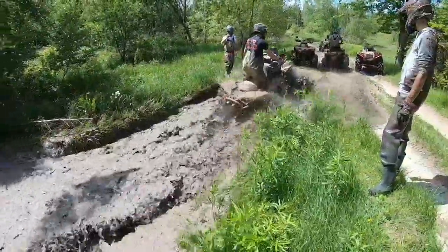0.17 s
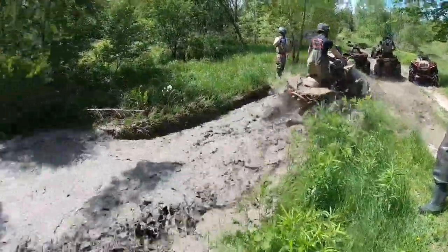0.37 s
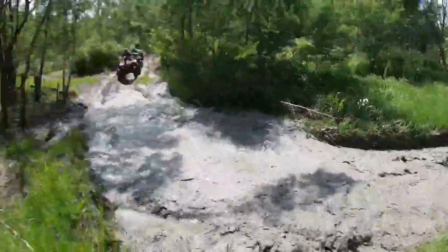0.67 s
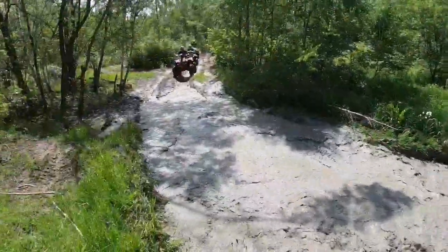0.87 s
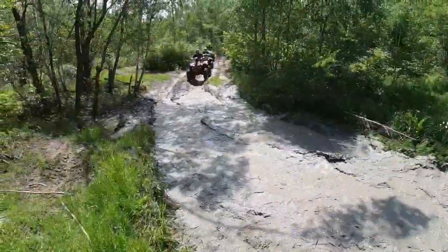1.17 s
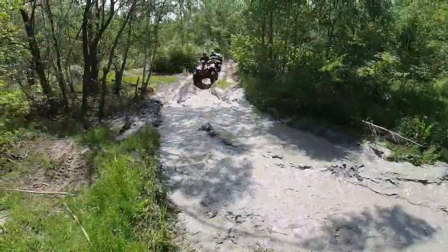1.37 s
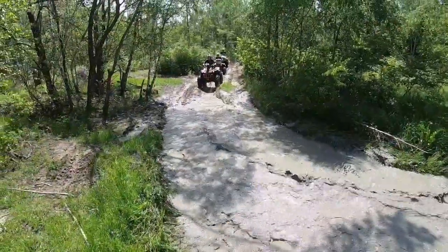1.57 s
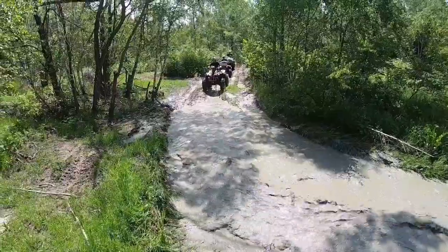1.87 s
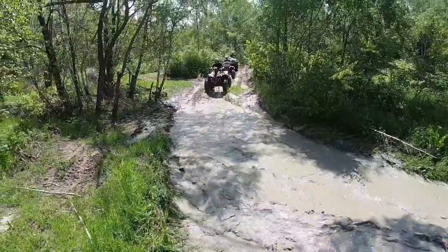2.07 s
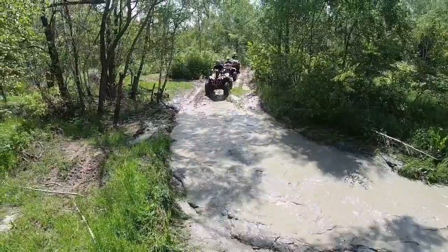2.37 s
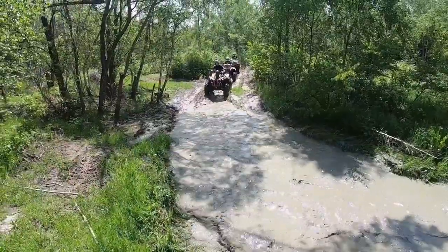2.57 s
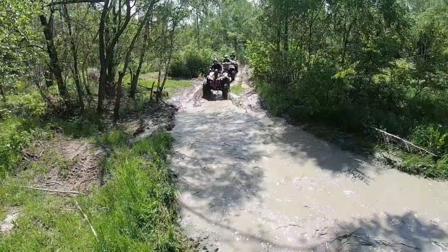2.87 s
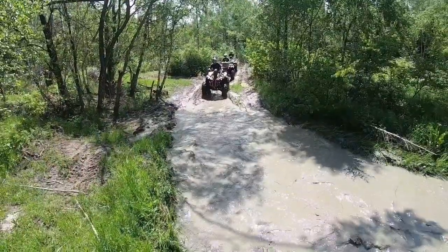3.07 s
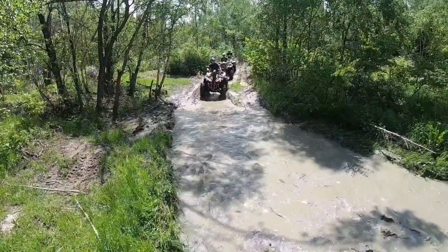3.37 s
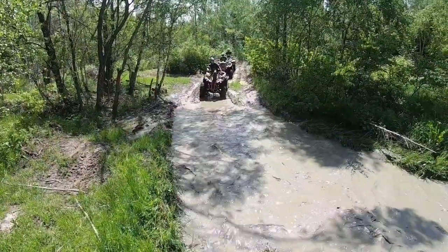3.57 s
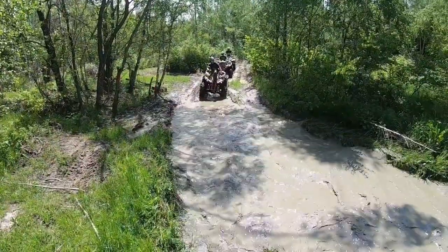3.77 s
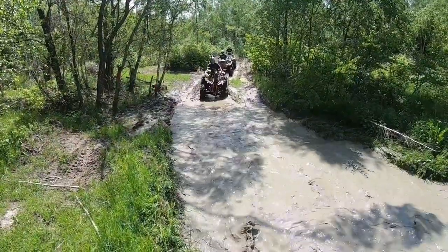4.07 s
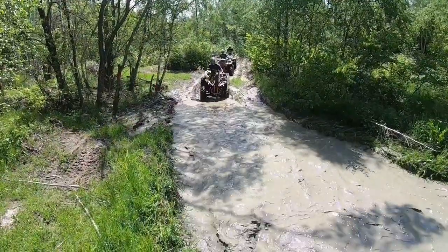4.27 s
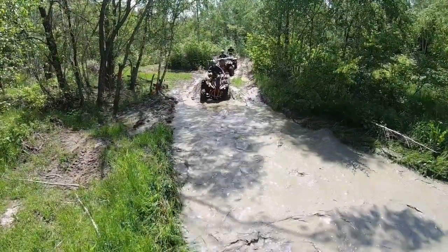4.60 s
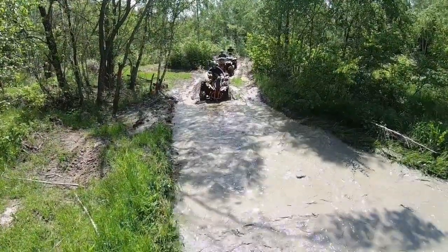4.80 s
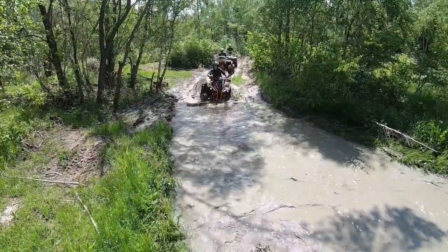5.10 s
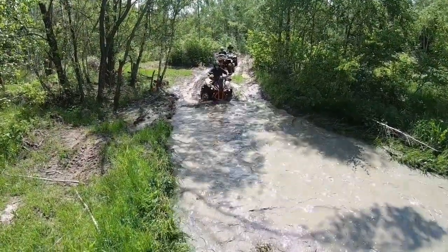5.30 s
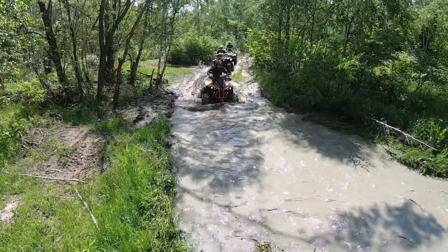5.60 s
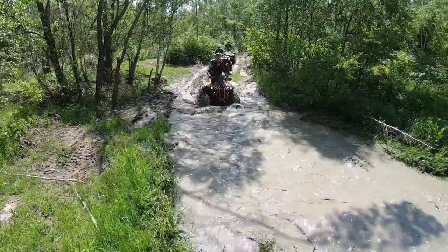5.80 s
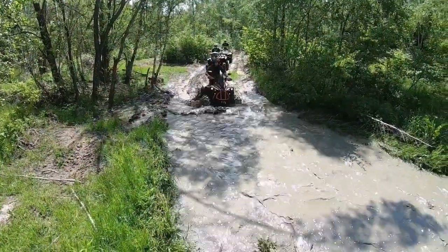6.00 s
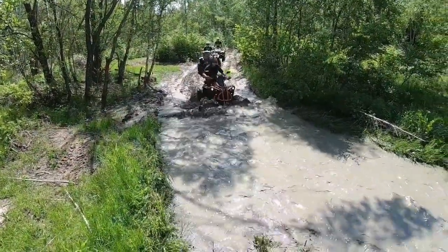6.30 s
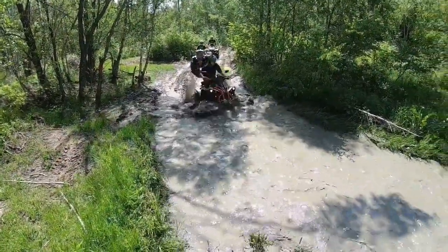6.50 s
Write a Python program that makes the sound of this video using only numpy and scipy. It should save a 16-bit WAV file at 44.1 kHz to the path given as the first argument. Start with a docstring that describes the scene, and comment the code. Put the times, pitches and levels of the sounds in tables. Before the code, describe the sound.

Close, raspy twin-cylinder engine climbs in pitch and passes within the first half second, flinging wet mud. Lumpy, overlapping idles follow with light water wash and a faint grasshopper scrape. Then an approaching quad gives short throttle blips and longer surges, splashing harder and ending at its loudest, highest revs. Open woodland, with engine sound scattered by trees, heard from beside the mud hole.

```python
"""An engine booms and rasps close by as a V-twin quad bike revs out of water on a muddy forest track and
drives off; two more crawl up, the first blipping its throttle several times and opening up as it nears.
Uneven firing pulses pass through silencer responses for boom and bark; gas noise, ringing and shocks make
the rasp. Shaped noise and random impacts make water and mud, short noise bursts a grasshopper."""
import sys
import numpy as np
from scipy import signal
from scipy.fft import rfft, irfft, next_fast_len
from scipy.io import wavfile
from scipy.ndimage import uniform_filter1d, minimum_filter1d, map_coordinates

SR = 44100
rng = np.random.default_rng(int(sys.argv[2]) if len(sys.argv) > 2 else 0)


def dump_mix(stems):
    """Bounce the given channels to the path in sys.argv[1] as a 16-bit WAV at rate SR."""
    frames = np.atleast_2d(stems).T  # one column per channel
    limited = np.clip(frames, -1, 1)  # hard clip at full scale
    pcm = np.round(limited * 32767).astype(np.int16)
    wavfile.write(sys.argv[1], SR, pcm)


N = 293265
TIME = np.arange(N) / SR
PASS_S = 0.362   # the leaving quad's tailpipe swings past the listener


def from_db(db):
    """Decibels to gain."""
    return 10 ** (np.asarray(db) / 20)


def in_time(rows):
    """Each column of a curve at every sample."""
    s, *columns = np.transpose(rows)
    return [np.interp(TIME, s, c) for c in columns]


def even(x, size=5000):
    """Hold the slow level near rms 1, leaving the single beats alone; size is in samples."""
    power = uniform_filter1d(uniform_filter1d(x * x, size), size)
    return x / np.sqrt(np.abs(power) + 1e-14)


def gains(points, size):
    """A spectrum table as gains on an FFT grid."""
    hz, db = np.transpose(points)
    grid_hz = np.arange(size // 2 + 1) * SR / size
    return from_db(np.interp(np.log(grid_hz + 1), np.log(hz), db))


def colour(x, points):
    """Causal (minimum-phase) filter with the given response."""
    size = next_fast_len(N + SR // 2, True) // 2 * 2
    cepstrum = irfft(np.log(gains(points, size)))
    # folding the cepstrum onto positive time gives minimum phase
    cepstrum[1:size // 2] *= 2
    cepstrum[size // 2:] = 0
    return irfft(rfft(x, size) * np.exp(rfft(cepstrum)))[..., :N]


def crossover(x, hz, kind):
    """Steep low or high half of a signal; the two halves add in phase."""
    sos = signal.butter(4, hz, kind, fs=SR, output="sos")
    return signal.sosfiltfilt(sos, x)


def bandpass(x, order, low_hz, high_hz):
    """Causal resonant band."""
    sos = signal.butter(order, [low_hz, high_hz], "band", fs=SR, output="sos")
    return signal.sosfilt(sos, x)


def drift(rate):
    """Random wander around 0: normal draws, rate of them a second, joined by straight lines."""
    knots = rng.standard_normal(2048)
    return map_coordinates(knots, [TIME * rate], order=1, mode="wrap")


def drops(per_s, spread):
    """Random impacts at a wandering rate, many small and a few large; spread is in dB."""
    sizes = from_db(spread * np.minimum(rng.exponential(1, N), 6)) * rng.choice([-1, 1], N)
    hits = rng.random(N) < per_s * from_db(3 * drift(25)) / SR
    return even(sizes * hits)


def grasshopper(tick_db=-4, tick_s=0.0083):
    """Short, high scrapes, about ten a second within each run: noise that strikes at once and fades after each."""
    # Each row: time in seconds, level in dB before the tick_db trim.
    ticks = [(3.705, -43), (3.8046, -41), (3.8998, -45), (4.089, -48), (4.187, -48), (4.283, -49),
             (4.374, -46), (4.4682, -45), (4.661, -45)]
    bursts = sum(from_db(db + tick_db) * (TIME > s) * np.exp(-np.abs(TIME - s) / tick_s) for s, db in ticks)
    scrape = colour(rng.standard_normal(N), [(5000, -33), (7800, 6), (9000, 6.5), (11000, -25)])
    return bursts * even(scrape)


def water(slosh_db=11.5, spray_db=0.0, grain=0.62, patchy_db=1.0):
    """Wheels churn the pool: a gurgling wash, and spray that patters back."""
    # Level of the spray. Each row: time in seconds, level in dB before the trims.
    spray_level = [(0.0, -41), (0.3, -41.5), (0.33, -40.5), (0.94, -47), (1.2, -45), (1.76, -49.5),
                   (1.85, -45.5), (2.15, -49.5), (3.09, -44), (3.39, -49.5), (5.24, -51), (5.81, -49.5),
                   (5.96, -51), (6.48, -40.5), (6.59, -40.5), (6.65, -37)]
    # Tone of the gurgling wash. Each row: frequency in Hz, relative dB per Hz.
    slosh_colour = [(200, -0.5), (350, 10.5), (600, 1), (850, -5), (1250, -4.5), (1650, -4), (2000, -6.5),
                    (2350, -6.5), (2650, -11), (3100, -7.5), (3700, -15.5), (5000, -22), (8000, -49)]
    # Tone of the pattering spray. Each row: frequency in Hz, relative dB per Hz.
    spray_colour = [(2500, -0.5), (4000, 4), (5500, 5), (6500, 4.5), (7300, 5.5), (8400, 4), (9200, -3),
                    (10200, -3), (11200, -17.5), (14000, -16), (15000, -35)]
    slosh_follows = 0.94   # share of the spray's swing in dB that the slosh follows
    spray, = in_time(spray_level)
    slosh = spray.mean() + slosh_follows * (spray - spray.mean())
    wash = even(colour(rng.standard_normal(N) + grain * drops(900, 2.96), slosh_colour))
    patter = even(colour(rng.standard_normal(N) + grain * drops(2500, 4.0), spray_colour))
    wash_gain = from_db(slosh + slosh_db + patchy_db * drift(40))
    patter_gain = from_db(spray + spray_db + patchy_db * drift(24))
    return wash_gain * wash + patter_gain * patter


def thrown_mud(level_db=-40, lumps_db=4, lumps_per_s=35):
    """The spinning tyres of the leaving quad fling lumps of mud that land in uneven bursts."""
    # Tone of the wet slaps. Each row: frequency in Hz, relative dB per Hz.
    mud_colour = [(700, -21), (1500, 5), (2400, -27), (2800, -5), (3400, 2), (4300, -4), (5500, -9),
                  (9000, -50), (12000, -52)]
    middle_s, spread_s = 0.32, 0.37   # of the shower
    flight = np.exp(-((TIME - middle_s) / spread_s) ** 2)
    bursts = from_db(level_db + lumps_db * drift(lumps_per_s))
    return bursts * flight * even(colour(drops(2300, 3.3), mud_colour))


def splats(band_hz=300, attack_s=0.0022):
    """Larger lumps squelch as they land: each squeezes out a burst of tiny bubbles around one pitch."""
    # Each row: time in seconds, pitch in Hz, level in dB before the envelope, decay in seconds.
    landings = [(0.126, 3150, -30.5, 0.019), (.132, 2400, -35, .02), (.165, 2430, -31, .022),
                (.172, 3270, -39, 0.035), (0.196, 2430, -30, .015), (0.267, 2940, -41, 0.016),
                (.335, 4200, -30, 0.017), (0.494, 3090, -29, 0.024), (0.561, 3120, -41, 0.1)]
    out, age = np.zeros(N), TIME[:SR // 2]
    for s, hz, db, decay_s in landings:
        bubbles = bandpass(rng.standard_normal(len(age)), 2, hz - band_hz / 2, hz + band_hz / 2)
        fizz = even(bubbles, size=600)
        envelope = -np.expm1(-age / attack_s) * np.exp(-age / decay_s)
        start = int(s * SR)
        out[start:start + len(age)] += from_db(db) * fizz * envelope
    return out


def engine_speed(quad):
    """Cycles per second: the flywheel rounds off changes of speed, and a slow engine hunts more."""
    # For each quad, each row: time in seconds, speed in four-stroke cycles per second.
    speeds = {"leaving": [(0, 26.2), (.1, 29.5), (.3, 34.8), (.4, 39.1), (.48, 41.9), (.54, 40.8), (.6, 35),
              (.68, 29.9), (.8, 27.3), (.9, 22.8), (1.15, 21.6), (1.3, 22.3), (1.52, 23.8), (1.65, 22.5),
              (1.8, 26.4), (2.1, 23), (2.55, 26.3), (3.3, 22), (6.65, 24)], "coming": [(0, 16.5), (1.9, 17),
              (2.6, 16), (2.78, 17.5), (2.92, 22.4), (3.08, 23.3), (3.3, 21.4), (3.5, 20), (3.7, 19.3),
              (3.85, 19.3), (3.95, 18.5), (4.08, 17), (4.27, 20.6), (4.45, 21.3), (4.6, 22.1), (4.85, 28.6),
              (5, 31.2), (5.12, 32.1), (5.25, 31.3), (5.45, 27.6), (5.6, 30), (5.75, 35), (5.82, 34.6),
              (5.97, 30.8), (6.1, 36.5), (6.25, 43.5), (6.4, 49.6), (6.65, 58.7)], "following": [(0, 19.3),
              (.7, 21.2), (.9, 18.4), (1.1, 18.4), (1.3, 18.6), (1.7, 19.2), (1.85, 22.6), (2.1, 20.1),
              (2.5, 20.6), (2.62, 20.9), (2.8, 18.6), (2.98, 17.9), (3.2, 19.5), (3.55, 16.1),
              (6.65, 17.5)]}
    flywheel_s = 0.05
    hunt, hunt_per_s = 0.0079, 6.0   # share of the speed at 18 cycles/s, turns of the wander a second
    speed, = in_time(speeds[quad])
    hunting = 1 + hunt * drift(hunt_per_s) * (18 / speed) ** 4
    return uniform_filter1d(speed, int(flywheel_s * SR), mode="nearest") * hunting


def revs_of(quad):
    """The twists of one quad's throttle, as numbers."""
    # Each row: opens in seconds, shuts in seconds, time the load takes to ease in seconds,
    # boom lift in dB, bark level in dB, rasp level in dB (all at full load), quad.
    twists = [(-0.125, 0.493, 20, 2.5, -22, -24.5, "leaving"), (0.67, 0.93, 1.4, 0, -35.5, -66, "leaving"),
              (1.146, 1.543, 3, 0.7, -31.5, -62, "leaving"), (1.7, 2.551, 1.5, 0.8, -43, -61, "leaving"),
              (2.78, 3.142, 0.66, 2, -26.5, -43.5, "coming"),
              (4.062, 4.256, 0.34, 4.5, -27.5, -39.5, "coming"), (4.62, 5.215, 0.97, 3, -26, -40, "coming"),
              (5.42, 5.802, 4.7, 3, -28, -39, "coming"), (5.93, 6.65, 12, 3, -18.5, -22, "coming")]
    return np.array([row[:-1] for row in twists if row[-1] == quad])


def loads(quad, release_s, hold_s=0):
    """Load 0-1, one row a rev: builds as the throttle opens, eases as speed levels off, drops at the shut."""
    attack_s = 0.078
    opens, shuts, eases_s = revs_of(quad).T[:3, :, None]
    age = np.maximum(TIME - opens, 0)
    since_shut = np.maximum(TIME - shuts - hold_s, 0)
    return -np.expm1(-(age / attack_s) ** 2) * np.exp(-age / eases_s - since_shut / release_s)


def drive(quad):
    """What the throttle does to one quad: speed, load, lift of the boom (dB), and gains of bark and rasp."""
    load_release_s = 0.11
    rasp_release_s, rasp_hold_s = 0.061, 0.021   # rasp dies away just after the throttle shuts
    bark_power, rasp_power = 1.87, 4.35   # each grows with this power of speed
    _, shuts, _, boom_db, bark_db, rasp_db = revs_of(quad).T
    speed, load = engine_speed(quad), loads(quad, load_release_s)
    of_top = speed / np.interp(shuts, TIME, speed)[:, None]   # against the speed at each shut
    rasp_load = loads(quad, rasp_release_s, rasp_hold_s)
    return dict(speed=speed, load=load.sum(axis=0), boom=boom_db @ load,
                bark=from_db(bark_db) @ (load * of_top ** bark_power),
                rasp=from_db(rasp_db) @ (rasp_load * of_top ** rasp_power))


def firings(rate, second_turn, second_db, pipe_lag_s, start_turn, rough=.07, jitter_s=.00006):
    """Two unevenly spaced exhaust pulses a cycle, one by a longer pipe; slow running burns less evenly."""
    turns, out = np.cumsum(rate) / SR + start_turn, np.zeros(N)
    for offset, lag, db in ((0, pipe_lag_s, 0), (second_turn, 0, second_db)):
        at = np.flatnonzero(np.diff(np.floor(turns - offset)))
        # random timing and strength, spread as given at 20 cycles/s
        chance = rng.standard_normal((400, 2))[:len(at)].T * (20 / rate[at]) ** 2
        when = np.clip(at + (lag + jitter_s * chance[0]) * SR, 0, N - 1).astype(int)
        out[when] += from_db(db) * np.exp(rough * chance[1])
    return out


def silencer(pulses, quad, pipe, open_pipe, open_from, open_span, by_load):
    """The harder the engine is driven, the more the sound leans to the open-throttle response."""
    throttle = np.clip((quad["speed"] - open_from) / open_span + by_load * quad["load"], 0, 1)
    return even((1 - throttle) * colour(pulses, pipe) + throttle * colour(pulses, open_pipe))


def smear(pulses, chamber_s=0.00582, feedback=.65):
    """Gas bounces in the silencer chamber, so each pulse rings on briefly (an allpass echo)."""
    size = next_fast_len(N + SR // 2, True) // 2 * 2
    trip = np.exp(-2j * np.pi * np.arange(size // 2 + 1) * SR / size * chamber_s)
    return irfft(rfft(pulses, size) * (trip - feedback) / (1 - feedback * trip))[:N]


def honk(x):
    """One low pipe resonance stands out as the rev peaks and the tailpipe points at the listener."""
    peak_s, width_s, hz, band_hz, honk_db = 0.518, 0.032, 245, 17, 12.5
    swell = from_db(honk_db) * np.exp(-((TIME - peak_s) / width_s) ** 2)
    return x + swell * bandpass(x, 1, hz - band_hz / 2, hz + band_hz / 2)


def exhausts(leaving, coming, following, goes, comes, crossover_hz=325, rumble_db=-18, top_hz=1300):
    """Three engines share the low boom; load brings out the bark above it."""
    # Balance of the engines. Each row: time in seconds, leaving, coming and following quad in dB.
    presence = [(0, -14, -33, -23), (.55, -5.5, -22, -16), (.85, 3, -4, -5.5), (1.1, -5.5, -13, -2.5),
                (1.55, -7.5, -10.5, -8), (1.9, -7, -4.5, -0.5), (2.5, -11, -11, -5.5),
                (2.8, -10, -3.5, -0.5), (3.05, -12, -1.5, -2.5), (3.5, -19, -7, -4.5),
                (3.85, -8, -3.5, -10), (4.2, -17, -5, -5), (4.5, -15, -9, -11.5), (4.9, -12, -1, -12),
                (6.65, -29, -4.5, -18.5)]
    # Silencer responses. Each row: frequency in Hz, response in dB.
    pipe_leaving = [(25, -41), (45, -18), (72, 9), (115, 2.5), (160, -4), (220, -2.5), (290, -11),
                    (350, -32.5), (402, -4.5), (440, -24), (480, -3.5), (535, -34), (590, -13),
                    (700, -24.5), (1000, -45.5)]
    pipe_coming = [(25, -42.5), (45, -17.5), (62, -4), (100, -1.5), (130, 5.5), (160, 3.5), (205, 2),
                   (250, -7), (320, -7.5), (380, -15.5), (430, -15.5), (470, -22), (530, -12.5), (600, -31),
                   (670, -23), (750, -40.5), (1000, -54)]
    pipe_following = [(25, -42), (50, -7), (70, -7.5), (90, 3), (115, -0.5), (140, -1.5), (165, -0.5),
                      (200, -2), (245, -13.5), (285, -9.5), (315, -8.5), (360, -26.5), (400, -11.5),
                      (480, -20), (540, -27.5), (620, -42.5), (1000, -58)]
    # Silencers at wide-open throttle. For each quad, each row: frequency in Hz, response in dB.
    pipe_open = {"leaving": [(30, -24.5), (50, -5), (70, 3.5), (90, 5.5), (115, 1.5), (140, 9.5), (165, 2),
                 (200, 2.5), (245, -3), (285, -6.5), (325, -6), (370, -6), (420, -16), (480, -10),
                 (540, -10), (620, -16), (750, -31), (1000, -54.5)], "coming": [(30, -31), (50, -2),
                 (70, 1), (90, 3), (115, -1.5), (140, 1.5), (165, 1), (200, 4.5), (245, 1), (285, -5),
                 (325, -4), (370, -8.5), (420, -12.5), (480, -19), (540, -20), (620, -22), (750, -28),
                 (1000, -51)]}
    # Low rumble of tyres and churned mud. Each row: frequency in Hz, relative dB per Hz.
    rumble_colour = [(10, -38.5), (25, -17), (45, -9.5), (70, -1.5), (150, -12), (280, -1.5), (500, -20.5),
                     (900, -62)]
    load_trim_db = -0.5   # change in the balance for an engine under full load
    idle_boom_db, idle_bark_db = -14.5, -50.5

    leaving_db, coming_db, following_db = in_time(presence)
    rumble = from_db(rumble_db) * even(colour(rng.standard_normal(N), rumble_colour))
    first = honk(silencer(leaving, goes, pipe_leaving, pipe_open["leaving"],
                          open_from=24.85, open_span=7.4, by_load=0.28))   # speeds in cycles/s
    second = silencer(coming, comes, pipe_coming, pipe_open["coming"],
                      open_from=32.17, open_span=1.8, by_load=0.083)
    third = even(colour(following, pipe_following))
    mix = (from_db(leaving_db + load_trim_db * goes["load"]) * first
           + from_db(coming_db + load_trim_db * comes["load"]) * second
           + from_db(following_db) * third + rumble)
    mix = crossover(smear(mix), top_hz, "low")
    low = even(crossover(mix, crossover_hz, "low"))
    high = even(crossover(mix, crossover_hz, "high"))
    boom = from_db(idle_boom_db + goes["boom"] + comes["boom"])
    bark = from_db(idle_bark_db) + goes["bark"] + comes["bark"]
    return boom * low + bark * high


def cracks(pulses, evenness=0.33):
    """Pulses steepen into short shocks at the pipe mouth; both cylinders crack about equally."""
    # Tone of a shock. Each row: frequency in Hz, relative level in dB.
    crack_colour = [(350, -20), (750, -4), (1150, 10), (1800, -12), (2400, -2.5), (4200, -15.5),
                    (7500, -32), (12000, -45)]
    return even(colour(pulses ** evenness, crack_colour))


def rasp(pulses, spectrum, puff_s, ring, uneven_db, hiss):
    """Each firing lets out a puff of turbulent gas and sets the pipe ringing, the same way every time."""
    pulses = pulses * from_db(uneven_db * drift(150))
    fade = np.exp(-TIME[:SR // 20] / puff_s)
    puffs = signal.fftconvolve(pulses, fade)[:N]
    ringing = signal.fftconvolve(pulses, fade * rng.standard_normal(len(fade)))[:N]
    gas = even((puffs + hiss) * rng.standard_normal(N)) + ring * even(ringing)
    return even(colour(gas, spectrum))


def coming_rasp(pulses, comes):
    """Gas noise and faint shocks from the coming quad, as loud as its throttle makes them."""
    # Each row: frequency in Hz, relative dB per Hz.
    coming_colour = [(200, -46), (410, -27), (700, 6), (820, -4.5), (960, -3), (1140, -2), (1340, 4),
                     (1590, -1.5), (1900, -12.5), (2270, -2.5), (2780, -14.5), (3350, -8), (4300, -14.5),
                     (4800, -21), (8030, -22), (10700, -38), (15000, -59)]
    crack_db = -12.5   # against the rasp
    gas = rasp(pulses, coming_colour, puff_s=0.016, ring=0.85, uneven_db=-2.5, hiss=0.47)
    return comes["rasp"] * even(from_db(crack_db) * cracks(pulses) + gas)


def pass_by(x):
    """The rasp swells as the tailpipe swings past; its open mouth then faces the listener and blares."""
    width_s, swell_db = 0.04, 5
    blare_low_hz, blare_high_hz = 790, 1340   # the pipe mouth's own band
    blare_db, blare_lead_s = -26, 0.022
    swell = from_db(swell_db * np.exp(-((TIME - PASS_S) / width_s) ** 2))
    facing = from_db(blare_db) * (1 + np.tanh((TIME - PASS_S + blare_lead_s) / width_s)) / 2
    mouth = bandpass(x, 1, blare_low_hz, blare_high_hz)
    return swell * (x + facing * mouth)


def leaving_rasp(pulses, goes):
    """Gas noise from the leaving quad, with shocks heard around its pass."""
    # Each row: frequency in Hz, relative dB per Hz.
    leaving_colour = [(410, -31), (690, -2.5), (775, 8), (840, -6), (980, 0), (1160, -3.5), (1700, -7),
                      (2050, -8.5), (2320, -0.5), (2560, -22), (3050, -5.5), (3620, -26.5), (4150, -15),
                      (5510, -26), (7250, -23), (10700, -48), (15000, -35)]
    crack_db, crack_width_s = 1, 0.17   # against the rasp
    shocks = from_db(crack_db) * np.exp(-((TIME - PASS_S) / crack_width_s) ** 2) * cracks(pulses)
    gas = rasp(pulses, leaving_colour, puff_s=0.0075, ring=1.03, uneven_db=0.5, hiss=0.34)
    return goes["rasp"] * pass_by(even(shocks + gas))


def forest(direct, scattered, scatter_s=0.026):
    """Trunks and leaves scatter the sound, so the two sides differ much more in the treble."""
    # Diffuse sound from the trees. Each row: frequency in Hz, side against mid in dB.
    width = [(30, -14), (60, -22), (200, -26), (400, -29), (700, -2), (2500, -4), (5000, -3.5), (9000, 4),
             (14000, -2.5)]
    # Stereo lean. Each row: frequency in Hz, left minus right in dB.
    tilt = [(60, -1), (150, -1.26), (300, 0), (700, -4.5), (1300, -3.5), (2800, -6.5), (5500, -1.5),
            (9500, -4.5), (13000, 0)]
    size = SR // 4
    echoes = rng.standard_normal(size) * np.exp(-TIME[:size] / scatter_s)
    side = colour(signal.fftconvolve(scattered, echoes / np.linalg.norm(echoes))[:N], width)
    return np.array([colour(direct + sign * side, [(hz, sign * db / 2) for hz, db in tilt])
                     for sign in (1, -1)])


def scene(rasp_pan_db=4.0):
    """Three engines, the water, flung mud and an insect among the trees."""
    goes, comes = drive("leaving"), drive("coming")
    leaving = firings(goes["speed"], second_turn=.416, second_db=-4.0, pipe_lag_s=0.00149, start_turn=0.95)
    coming = firings(comes["speed"], second_turn=.376, second_db=-2.5, pipe_lag_s=0.00005, start_turn=.4)
    following = firings(engine_speed("following"), second_turn=0.265, second_db=-6.5,
                        pipe_lag_s=0.00035, start_turn=.7)
    around = grasshopper() + water() + thrown_mud() + splats()
    around = around + exhausts(leaving, coming, following, goes, comes)
    close = coming_rasp(coming, comes) + leaving_rasp(leaving, goes)
    direct = from_db([[rasp_pan_db / 2], [-rasp_pan_db / 2]]) * close   # rasp arrives mostly direct
    return forest(around, around + from_db(-22.5) * close) + direct


def record(dry, threshold_db=-8.5, detector_db_per_s=200, size=200, firmness=0.2, gain_db=-1.0):
    """A gentle limiter eases the peaks by a share (firmness) of their overshoot; the top is cut."""
    cutoff_hz = 16000   # where the cut reaches its full 70 dB
    over = np.maximum(20 * np.log10(np.abs(dry).max(axis=0) + 1e-9) - threshold_db, 0)
    # the detected overshoot jumps up at once and falls back at a steady rate
    fall = detector_db_per_s * TIME
    held = np.maximum.accumulate(over + fall) - fall
    cut = uniform_filter1d(minimum_filter1d(-held, size), size)
    low_pass = signal.cheby2(12, 70, cutoff_hz, fs=SR, output="sos")
    return signal.sosfilt(low_pass, dry * from_db(firmness * cut + gain_db))


dry = scene()
out = record(dry)
dump_mix(out)
```